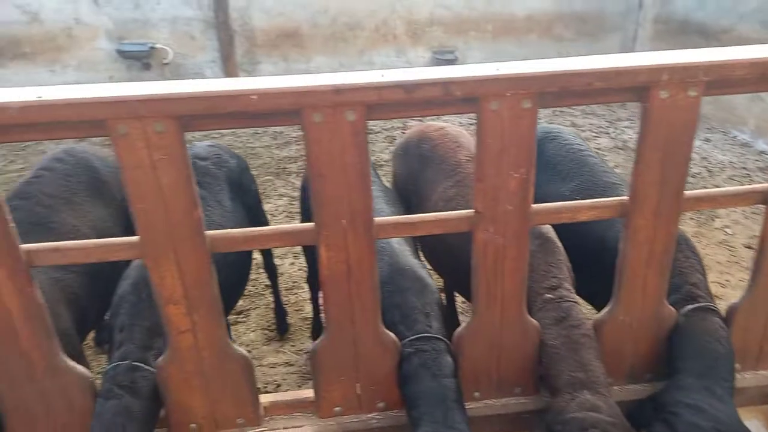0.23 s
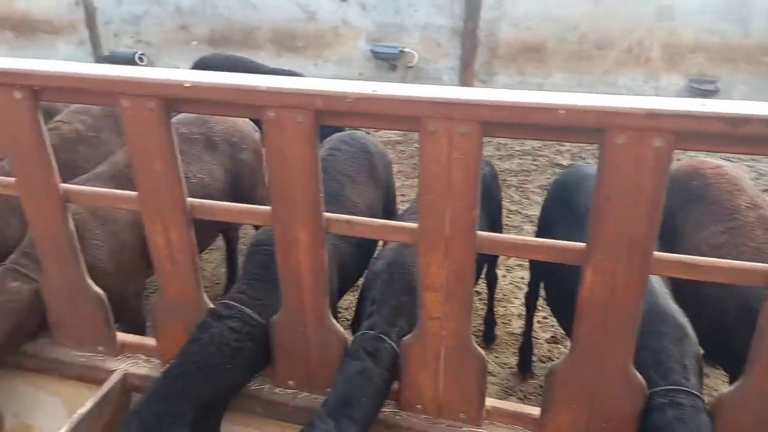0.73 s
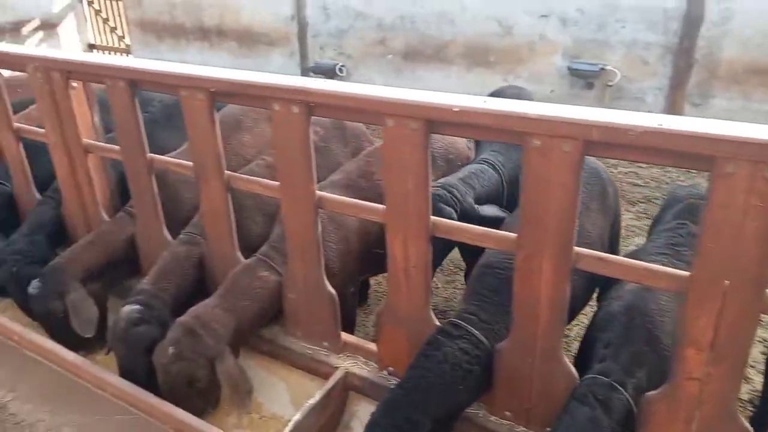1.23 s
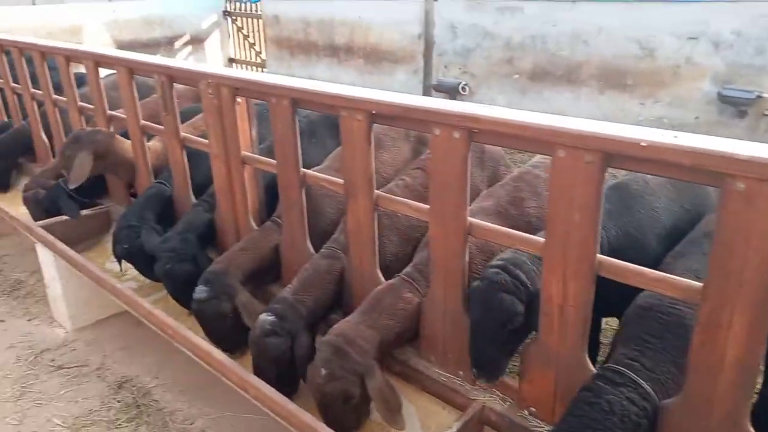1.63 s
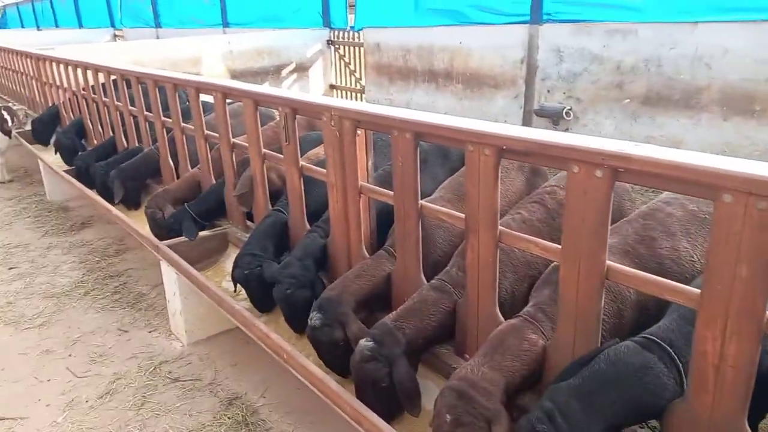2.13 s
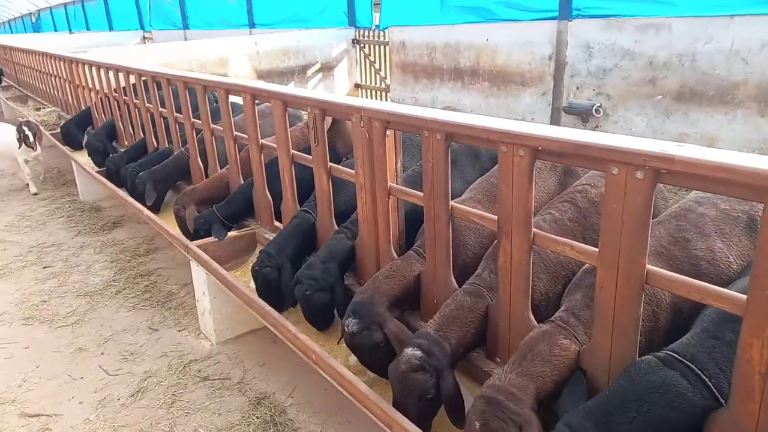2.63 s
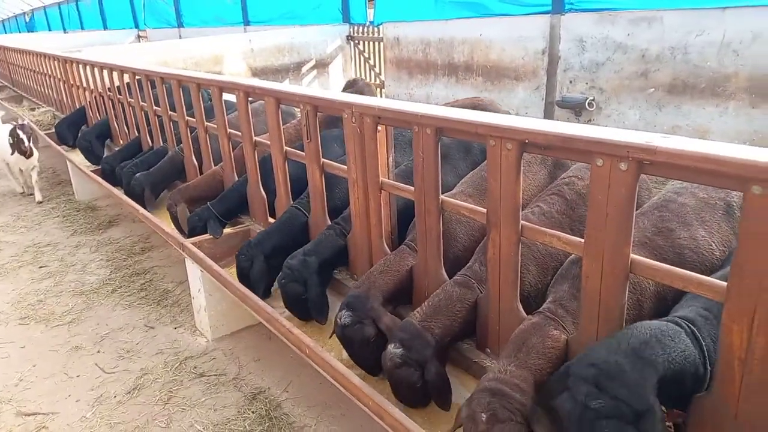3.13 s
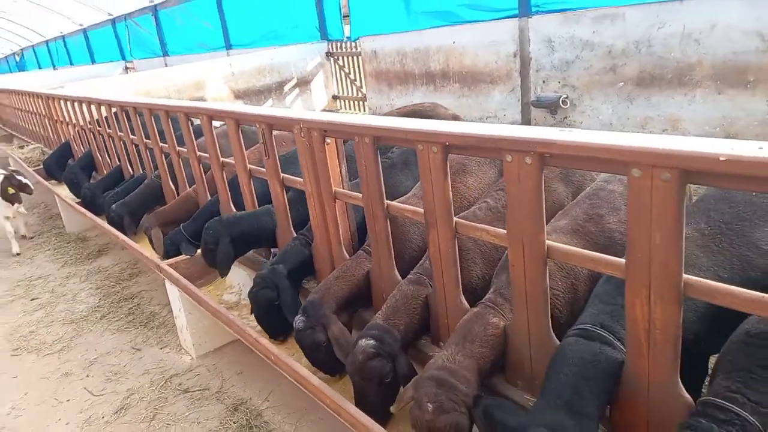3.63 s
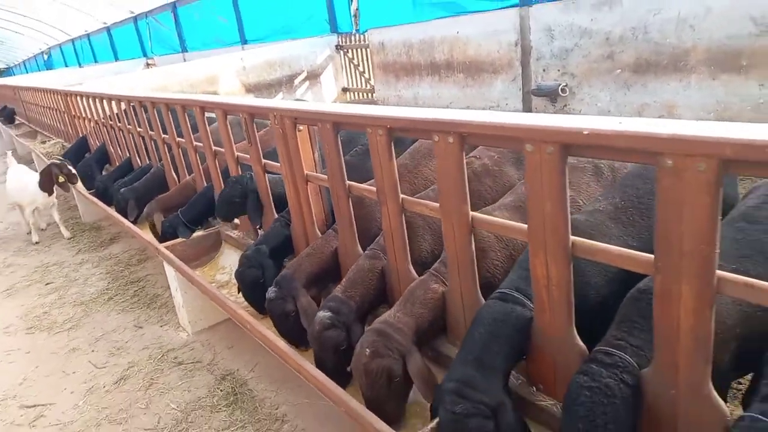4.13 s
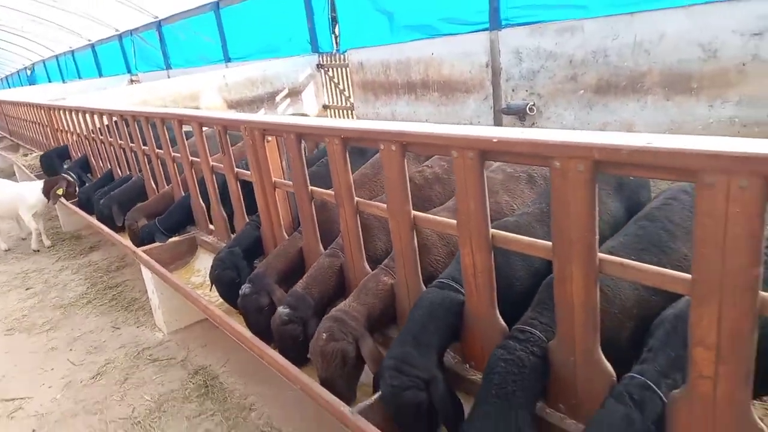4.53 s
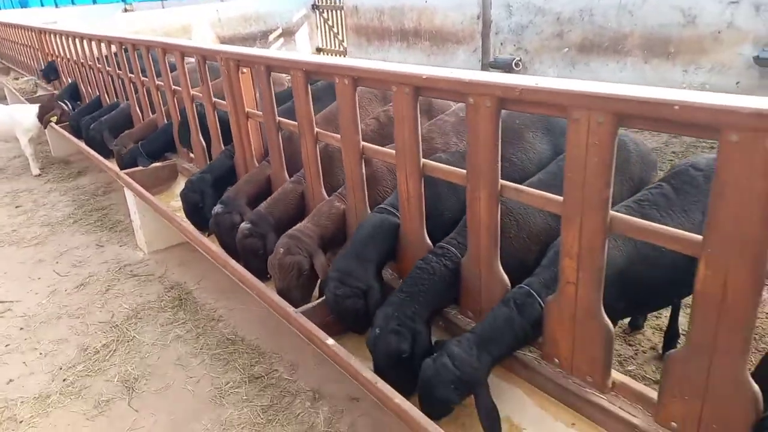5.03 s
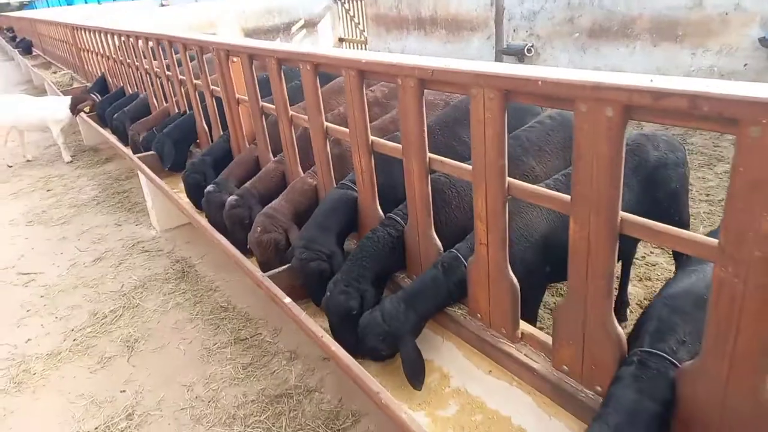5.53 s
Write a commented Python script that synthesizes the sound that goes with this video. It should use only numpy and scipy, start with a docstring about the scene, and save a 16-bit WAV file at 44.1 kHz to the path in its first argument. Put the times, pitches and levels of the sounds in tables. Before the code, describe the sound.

An open livestock shed with sheep and goats feeding, heard in stereo from beside the trough. The sound begins inside a loud, hoarse, low bleat from a near ewe, ending at about 0.3 s. A quieter, higher, lamb-like bleat swells from 0.6 to 1.5 s, with bumps and small ticks near 0.7-1.0 s. The ewe's loudest, clearer and drawn-out bleat runs from 1.6 to 2.4 s, nasal and buzzing, rising then dropping slightly. A more distant goat answers from 2.3 s, fading by 3.4 s. Muzzles rustle in dry feed throughout, stronger around 3.1 and 4.9 s; dull trough knocks come near 3.5-3.7, 4.4 and 5.2-5.4 s. Birds chirp harshly around 2.8-3.8 s and whistle at 4.0-4.5 and 5.1-5.8 s. A low closed-mouth rumble at 4.5 s leads into a short raspy bleat until 5.0 s; another rumble starts at 5.6 s. Soft wavering shed noise and short bright echoes surround everything.

```python
"""Sheep at a feed trough

Sheep feed in an open shed. A near ewe bleats twice, loud and drawn out; higher voices answer from down the row,
with a short hoarse bleat and closed-mouth rumbles: fold pulses and breath noise through throat resonances.
Muzzles rustle (grainy noise) and bump the trough (decaying modes), birds whistle outside (gliding tones),
the shed adds wavering octaves of noise, and walls and roof a short, bright echo (decaying noise)."""
import sys
import numpy as np
from scipy import signal
from scipy.fft import rfft, irfft
from scipy.io import wavfile
from scipy.ndimage import uniform_filter1d, map_coordinates

SR = 44100
rng = np.random.default_rng(int(sys.argv[2]) if len(sys.argv) > 2 else 0)


def to_wav(sig):
    """Store sig (one row per channel, or 1-D mono) as 16-bit WAV at the path in sys.argv[1].

    Samples outside -1..1 are clipped; the rate is SR.
    """
    pcm = np.clip(np.atleast_2d(sig), -1, 1) * 32767
    pcm = np.round(pcm).astype(np.int16)
    wavfile.write(sys.argv[1], SR, pcm.T)  # frames by channels


N = 254456
TIME = np.arange(N) / SR
TAPS = 4096
FREQS = np.arange(TAPS // 2 + 1) * SR / TAPS + 1  # Hz; the 1 keeps the logarithm finite


def undb(db):
    """Decibels to amplitude gain."""
    return 10 ** (np.asarray(db) / 20)


def unit(x):
    """Scale to rms 1."""
    return x / np.sqrt(np.mean(x ** 2))


def steady(x):
    """Scale to rms 1 over every thirtieth of a second."""
    return x / np.sqrt(uniform_filter1d(x ** 2, SR // 30) + 1e-18)


def curves(rows, t):
    """Columns of a table, joined by straight lines, at the times t."""
    s, *columns = np.transpose(rows)
    return [np.interp(t, s, column) for column in columns]


def add(track, s, x):
    """Mix x into the track from s seconds on."""
    i = max(int(s * SR), 0)
    track[i:i + len(x)] += x[:max(N - i, 0)]


def walk(rate_hz, t):
    """Smooth random wander of rms 1: a cubic curve through rate_hz random knots per second."""
    knots = rng.standard_normal(N // 10)
    return unit(map_coordinates(knots, [t * rate_hz], order=3, mode="wrap"))


def shape(x, gain):
    """Minimum-phase filter with the given gain at FREQS: every peak rings after its excitation."""
    cepstrum = irfft(np.log(gain + 1e-6))
    # fold the cepstrum onto positive times
    cepstrum[1:TAPS // 2] *= 2
    cepstrum[TAPS // 2 + 1:] = 0
    response = irfft(np.exp(rfft(cepstrum)))
    return signal.fftconvolve(x, response)[:len(x)]


def colour(x, points):
    """Filter by (Hz, dB) points, joined by straight lines over log frequency."""
    hz, db = np.transpose(points)
    return shape(x, undb(np.interp(np.log(FREQS), np.log(hz), db)))


# Level course of each call. Each row: start, crest and end in seconds, upper-band attack in s, release in s,
# levels of the band below 1.1 kHz and of the band above in dB before attack, release and placing,
# fade in dB per s (negative grows), upper-band tremolo depth in dB.
BLEATS = {"hoarse ewe": (-.25, -.05, .325, .1, .15, -29.3, -28.5, 5, 0),
          "long ewe": (1.56, 1.92, 2.4, .2, .19, -26.3, -26.6, 4, 0),
          "lamb": (.62, .95, 1.46, .39, .16, -55.5, -45, 9, 0),
          "goat": (2.27, 2.67, 3.46, .16, .4, -50.8, -39.8, 15, 0),
          "rumble": (4.49, 4.672, 4.74, .09, .06, -45.5, -57, -20, 12),
          "short bleat": (4.69, 4.85, 4.97, .07, .12, -40.5, -34.3, 0, 8.5),
          "opening rumble": (5.56, 5.755, 5.85, .07, .04, -46, -51.5, -75, 7)}
# Pitch arch of each call. Each row: start, crest and end pitch in Hz, arch exponent (1 straight, 2 round).
PITCH = {"hoarse ewe": (135, 146, 125.5, 1.6), "long ewe": (110, 147.2, 118, 2.3),
         "lamb": (172, 196.5, 175.5, 1.15), "goat": (188, 197.3, 180, .8), "rumble": (119, 129.3, 125, 1.4),
         "short bleat": (146, 156.5, 148, 1.3), "opening rumble": (100, 126, 120, 1.2)}
# Roughness at the crest of each call, 0-1.
CREST_ROUGH = {"hoarse ewe": .6, "long ewe": .08, "lamb": .2, "goat": .18, "rumble": .3, "short bleat": .89,
               "opening rumble": .7}
# One surge of the low band. Each row: centre in seconds, width in s (between the 1/e points), rise in dB.
SURGE = {"long ewe": (2.205, .05, 3), "lamb": (1.06, .09, 5), "goat": (2.59, .18, 6.5)}
END_ROUGH = .9
ATTACK_DEPTH_DB, UPPER_RELEASE_DB = 40, 20
LOW_ATTACK_RATIO, LOW_RELEASE_RATIO, LOW_TREMOLO_RATIO = 1.4, 1.5, 1.6  # low band over upper band
TREMOLO_HZ = 11.5


def effort(call):
    """Times, pitch, two band levels and roughness of a call: a pitch arch under attack, hold and release."""
    start, crest, end, attack_s, release_s, low_db, high_db, fade, tremolo_db = BLEATS[call]
    start_hz, crest_hz, end_hz, arch = PITCH[call]
    t = TIME[max(int(start * SR), 0):int(end * SR)]
    away = np.interp(t, [start, crest, end], [1, 0, 1])  # 0 at the crest, 1 at both ends
    hz = crest_hz + (np.where(t < crest, start_hz, end_hz) - crest_hz) * away ** arch

    def swell(length_s):
        """Attenuation in dB while the call swells."""
        return ATTACK_DEPTH_DB * np.maximum(1 - (t - start) / length_s, 0) ** 2

    dying = UPPER_RELEASE_DB * np.maximum(1 - (end - t) / release_s, 0) ** 2
    fading = fade * (t - crest)
    stutter = tremolo_db * np.sin(np.pi * TREMOLO_HZ * (t - crest)) ** 2
    low = low_db - swell(attack_s * LOW_ATTACK_RATIO) - LOW_RELEASE_RATIO * dying
    low = low - fading - LOW_TREMOLO_RATIO * stutter
    if call in SURGE:
        s, length_s, rise_db = SURGE[call]
        low = low + rise_db * np.exp(-(2 * (t - s) / length_s) ** 2)
    high = high_db - swell(attack_s) - dying - fading - stutter
    rough = CREST_ROUGH[call] + (END_ROUGH - CREST_ROUGH[call]) * away ** 2
    return t, hz, low, high, rough


# Throat resonances. Each row: mid-call frequency in Hz, full width in Hz at 8.6 dB down, relative level in dB.
EWE_HOARSE_THROAT = [(75, 40, -17), (150, 570, -25.5), (408, 63, -9), (585, 150, 1), (1064, 220, -11),
                     (1254, 300, -19), (1500, 530, -8.5), (1998, 335, 1), (2374, 370, -7),
                     (3890, 1840, -18.5), (6370, 2200, -29)]
EWE_THROAT = [(75, 40, -13), (147, 240, -18.5), (276, 270, -20), (457, 73, -5), (567.4, 95, 2.5),
              (927, 300, -24), (1436, 325, -1.5), (1740, 400, -15), (2147, 347, 1), (2644, 340, -8),
              (3445, 820, -19.5), (4590, 760, -25), (6260, 1700, -29.5)]
LAMB_THROAT = [(390, 160, 1), (537, 180, 6), (1433, 290, 2.5), (2192, 376, 4.5), (2700, 330, -2),
               (3435, 250, -11), (4000, 4800, -18)]
GOAT_THROAT = [(796, 180, 5), (1007, 203, -11.5), (1586, 260, 0), (1950, 160, -2), (2164, 190, 4),
               (2390, 200, -1), (2600, 590, -10.5), (3560, 3600, -23)]
SHORT_THROAT = [(640, 170, 6), (835, 850, -7.5), (1556, 420, 7.5), (2140, 290, 13), (2610, 490, -1),
                (4220, 2500, -26)]
CLOSED_THROAT = [(124, 110, 4), (273, 160, 8), (352, 110, -1), (760, 600, -4.5), (1640, 370, -10.5),
                 (2030, 880, -4)]
ROUGH_WOBBLE, ROUGH_FLUTTER_DB = .006, 2  # rms pitch share and low-band dB at roughness 1
NASAL_HZ = 350  # below this the voice gains while the mouth is half shut, at both ends of a call
VOICE_TOP_HZ = 6900


def bleat(call, throat, jitter, rasp, quiver_db, air_db, opening_hz=0, closing_db=0):
    """Uneven fold pulses and a puff of air per cycle ring a throat gliding from -opening_hz to +opening_hz."""
    t, hz, low_db, high_db, rough = effort(call)
    uneven = jitter * walk(130, t) + ROUGH_WOBBLE * walk(24, t)
    phase = np.cumsum(hz * (1 + rough * uneven)) / SR  # cycles
    harmonics = np.arange(1, int(VOICE_TOP_HZ / hz.max()))
    pulses = unit(sum(np.cos(2 * np.pi * k * phase) for k in harmonics))
    pulses = pulses * undb(4.5 * rough * walk(110, t))
    puffs = unit(np.exp(-(phase % 1) / .35) * rng.standard_normal(len(t)))
    puffs = colour(puffs, [(100, -14), (600, -7.5), (2000, -2), (3500, 1), (6700, 3), (7300, 0)])
    source = pulses + rasp * rough * puffs

    # crossfade five throat positions from start (-1) to end (1)
    voice = 0
    for stage in (-1, -.5, 0, .5, 1):
        gain = 0
        for f, width, db in throat:
            detune = 2 * (FREQS - f - stage * opening_hz) / width
            gain = gain + undb(db) / (1 + detune ** 2) ** 1.436
        gain = gain * undb(closing_db * (abs(stage) - .5) / (1 + (FREQS / NASAL_HZ) ** 6))
        gain = gain / np.sqrt(1 + (FREQS / VOICE_TOP_HZ) ** 60)
        share = np.maximum(1 - 2 * abs(np.linspace(-1, 1, len(t)) - stage), 0)
        voice = voice + share * shape(source, gain)
    air = colour(puffs, [(5000, 10), (7500, -9.5), (12000, -3.5), (15500, -18.5)])
    voice = voice + undb(air_db) * air

    low = signal.sosfiltfilt(signal.butter(4, 1100, fs=SR, output="sos"), voice)
    high = steady(voice - low) * undb(high_db)
    low = steady(low) * undb(low_db + ROUGH_FLUTTER_DB * rough * walk(16, t))
    edges = signal.windows.tukey(len(t), 0.004 * SR / len(t))
    track = np.zeros(N)
    add(track, t[0], (low + high) * edges * undb(quiver_db * walk(35, t)))
    return track


# Background level. Each row: time in seconds, level in dB before SHED_GAIN_DB.
SHED_LEVEL = [(0, -56), (.55, -66), (1.5, -58), (3.1, -58), (3.5, -61), (3.95, -62.5), (5.05, -55.5),
              (5.5, -62.5), (5.77, -56.5)]
# Background spectrum. Each row: frequency in Hz, relative density in dB per Hz.
SHED_COLOUR = [(25, -35), (50, -6.5), (85, 5.5), (130, -5.5), (300, -2.5), (520, -9), (780, -5.5),
               (1100, -14.5), (1600, -1.5), (2200, 0.5), (3000, -6.5), (6500, -16), (7500, -29.5),
               (15000, -49)]
SHED_GAIN_DB = 0.5


def shed():
    """Diffuse noise: each octave wavers by itself; the bass is nearly alike in both ears."""
    level_db, = curves(SHED_LEVEL, TIME)
    stir = 0
    for hz in 30 * 2 ** np.arange(9):
        octave = signal.butter(2, [hz, 2 * hz], "band", fs=SR, output="sos")
        noise = signal.sosfilt(octave, rng.standard_normal((2, N)))
        stir = stir + noise * undb(2 * walk(13, TIME))
    mid, side = (colour(x, SHED_COLOUR) for x in stir)
    side = colour(side, [(100, -8), (300, -16), (800, -0.5)])
    return np.array([mid + side, mid - side]) / mid.std() * undb(level_db + SHED_GAIN_DB)


# Muzzles root in the feed. Each row: centre in seconds, width in s (13.6 dB down at its edges),
# peak level in dB before gain_db.
RUSTLES = [(.72, .1, -70), (1.0, .28, -70), (1.31, .12, -67.5), (1.59, .14, -62), (2.62, .2, -69),
           (3.06, .22, -60.5), (3.41, .1, -68), (3.6, .2, -63.5), (3.99, .32, -66.5), (4.35, .07, -64),
           (4.9, .34, -61), (5.26, .14, -67), (5.44, .07, -65), (5.7, .25, -64)]
# Feed spectrum. Each row: frequency in Hz, relative gain in dB.
FEED_COLOUR = [(2500, -12), (4500, -3.5), (6700, -3), (7400, -18), (9500, -10), (12000, -8.5), (15500, -15)]


def feeding(chewing_db=-73, grain_spread_db=1.5, gain_db=6, unrest_db=1.5):
    """Dense, uneven grains shift under many muzzles (chewing_db before gain_db), louder when one roots."""
    power = undb(chewing_db + unrest_db * walk(9, TIME)) ** 2
    for s, length_s, db in RUSTLES:
        power = power + undb(db) ** 2 * np.exp(-np.pi * (2 * (TIME - s) / length_s) ** 2)
    grains = undb(grain_spread_db * walk(400, TIME))
    ears = [unit(colour(grains * rng.standard_normal(N), FEED_COLOUR)) for _ in range(2)]
    return np.array(ears) * np.sqrt(power) * undb(gain_db)


def note(length_s, glide_hz, db, rough):
    """One tone gliding through three pitches; a fast pitch waver makes it harsh."""
    t = np.arange(int(length_s * SR)) / SR
    hz = np.polyval(np.polyfit([0, .5, 1], glide_hz, 2), t / length_s)
    phase = np.cumsum(hz * (1 + 0.0745 * rough * walk(595.7, t))) / SR
    level = undb(db + 2.5 * walk(40.5, t))
    return np.sin(2 * np.pi * phase) * signal.windows.tukey(len(t), .4) * level


# Whistles. Each row: start in seconds, length in s, start, middle and end pitch in Hz, level in dB before placing.
WHISTLES = [(.637, .29, 3420, 4030, 4850, -55.5), (1.465, .23, 4260, 5375, 6070, -51),
            (4.015, .075, 2285, 2450, 2720, -54), (4.105, .14, 2405, 2383, 2408, -51),
            (4.293, .18, 5410, 6650, 7100, -66.5), (4.343, .1, 2316, 2403, 2180, -52),
            (4.44, .11, 2090, 1920, 1980, -55.5), (5.073, .05, 2990, 2750, 2620, -60),
            (5.175, .24, 2217, 2281, 2260, -51.5), (5.297, .16, 5400, 6570, 7400, -62),
            (5.39, .11, 3940, 4460, 5200, -63.5), (5.487, .085, 5160, 5220, 5140, -56),
            (5.666, .085, 2248, 2233, 2290, -49.5), (5.692, .07, 3930, 4260, 4740, -55)]
# Chirps. Each row: start in seconds, length in s, middle pitch in Hz, level in dB before placing, roughness 0-1.
CHIRPS = [(.422, .038, 6400, -55.5, .4), (.557, .01, 4650, -46, .05), (.574, .05, 4845, -57, .4),
          (1.06, .06, 6480, -54.5, .5), (1.28, .09, 6600, -56, .35), (2.771, .076, 4120, -49.5, .7),
          (3.228, .04, 3950, -53.5, .8), (3.285, .03, 4350, -49.5, .8), (3.333, .03, 4400, -50, .8),
          (3.585, .1, 4280, -52, .5), (3.616, .0104, 4220, -39.5, .05), (3.69, .07, 4200, -57, .5),
          (3.785, .08, 4200, -52.5, 1)]
WHISTLE_ROUGH = .17
CHIRP_FALL = .03  # share of the pitch, either side of the middle


def birds():
    """Clear gliding whistles and falling chirps, many of them harsh."""
    track = np.zeros(N)
    for s, length_s, *glide_hz, db in WHISTLES:
        add(track, s, note(length_s, glide_hz, db, WHISTLE_ROUGH))
    for s, length_s, hz, db, rough in CHIRPS:
        glide_hz = hz * (1 + CHIRP_FALL * np.array([1, 0, -1]))
        add(track, s, note(length_s, glide_hz, db, rough))
    return track


# Heads bump the trough. Each row: start in seconds, peak level in dB before placing, ring in Hz.
BUMPS = [(0.716, -56.5, 198), (.827, -51.5, 414), (2.641, -65, 202), (2.826, -60, 179), (3.535, -53, 109),
         (3.599, -51, 298), (3.737, -57.5, 264), (4.406, -50.5, 265), (5.226, -59, 245), (5.435, -58, 298)]
# Trough modes. Each row: multiple of the ring, relative level in dB, t60 in s.
TROUGH = [(.32, -7, 0.083), (.72, -2.5, 0.06), (1, 1.5, 0.09), (1.23, -6, 0.086), (1.75, -12.5, 0.076),
          (2.6, -39, .05)]
# Ticks of feed and rails. Each row: start in seconds, level in dB before placing, pitch in Hz.
TICKS = [(.718, -52, 1500), (.842, -44, 4180), (1.022, -42.5, 3630), (3.739, -46.5, 3130)]


def knocks(tick_t60_s=0.01, push_s=0.025):
    """Soft, scuffing bumps (decaying noise) ring the trough modes; hard little contacts tick."""
    track, t = np.zeros(N), np.arange(SR // 3) / SR
    for s, db, hz in BUMPS:
        ring = 0
        for ratio, mode_db, t60_s in TROUGH:
            ring = ring + undb(mode_db - 60 * t / t60_s) * np.sin(2 * np.pi * hz * ratio * t)
        push = rng.standard_normal(len(t)) * np.exp(-t / push_s)
        thud = signal.fftconvolve(ring, push)[:len(t)]
        add(track, s, undb(db) * thud / abs(thud).max())
    for s, db, hz in TICKS:
        contact = np.sin(2 * np.pi * hz * t) + 0.1 * rng.standard_normal(len(t))
        add(track, s, undb(db - 60 * t / tick_t60_s) * contact)
    return track


def place(x, gain_db, wet_db, pan_db, lag_s, bend_rad=0, late_t60_s=0.5, early_t60_s=0.18, late_db=-8):
    """Direct sound reaches the right lag_s later; rails and wall scatter it early, the roof late, treble most."""
    t, lead = np.arange(int(SR * .7)) / SR, 256  # lead: samples of room for the earlier ear
    decay = undb(-60 * t / early_t60_s) + undb(late_db - 60 * t / late_t60_s)
    decay /= np.sqrt(np.sum(decay ** 2))
    # phase between the ears in radians: the lag, bent further in a narrow band
    between = 2 * np.pi * FREQS * lag_s + bend_rad * np.exp(-((FREQS - 580) / 110) ** 2)
    echo_colour = [(150, -16), (600, -13), (1400, -2.5), (2200, -1), (6000, 2), (14000, 0)]
    direct_colour = [(600, -2.5), (1400, -1.5), (2200, -5.5), (4000, -10)]
    ears = []
    for side in (1, -1):  # left, right
        direct = np.roll(irfft(np.exp(.5j * side * between)), lead)
        echo = colour(decay * rng.standard_normal(len(t)), echo_colour)
        response = np.pad(undb(wet_db) * echo, (lead, 0))
        response[:TAPS] += colour(direct, direct_colour)
        # pan_db: left over right, 1.4-2.6 kHz
        pan = side * pan_db / 2
        response = colour(response, [(400, 0.025), (600, side * 1.), (1400, pan), (2600, pan), (4000, 0)])
        ears.append(signal.fftconvolve(x, response)[lead:lead + N])
    return undb(gain_db) * np.array(ears)


def scene():
    """The animals along the trough, the birds and the shed."""
    hoarse = bleat("hoarse ewe", EWE_HOARSE_THROAT, jitter=0.042, rasp=0.93, quiver_db=1.0, air_db=-28,
                   opening_hz=-34, closing_db=3)
    long = bleat("long ewe", EWE_THROAT, jitter=.033, rasp=.9, quiver_db=1.0, air_db=-34,
                 opening_hz=22, closing_db=4)
    lamb = bleat("lamb", LAMB_THROAT, jitter=0.0304, rasp=.8, quiver_db=1.2, air_db=-53, opening_hz=110)
    goat = bleat("goat", GOAT_THROAT, jitter=0.0358, rasp=1.0, quiver_db=1.6, air_db=-56, opening_hz=10)
    short = bleat("short bleat", SHORT_THROAT, jitter=0.0501, rasp=2.0, quiver_db=1.5, air_db=-38)
    rumble = bleat("rumble", CLOSED_THROAT, jitter=0.055, rasp=1.3, quiver_db=1.5, air_db=-50)
    opening = bleat("opening rumble", CLOSED_THROAT, jitter=0.059, rasp=1.7, quiver_db=2.5, air_db=-47)
    return (place(hoarse, gain_db=0.5, wet_db=-0.5, pan_db=-5.5, lag_s=0.00035)
            + place(long, gain_db=5.0, wet_db=-0.5, pan_db=-5.5, lag_s=0.00036, bend_rad=0.74)
            + place(lamb + short, gain_db=0, wet_db=2.5, pan_db=-5.5, lag_s=0.00034)
            + place(goat, gain_db=-1, wet_db=3.5, pan_db=-5, lag_s=0.00016)
            + place(rumble + opening, gain_db=0, wet_db=10, pan_db=-7, lag_s=0.00036)
            + place(birds(), gain_db=2.5, wet_db=-2, pan_db=-1, lag_s=.00003)
            + place(knocks(), gain_db=8, wet_db=4.5, pan_db=-12, lag_s=.00004)
            + feeding() + shed())


def record(dry):
    """Band limits: the deepest bass rolls off below 45 Hz, the top is cut steeply above 15.75 kHz."""
    dry = signal.sosfilt(signal.butter(2, 45, "high", fs=SR, output="sos"), dry)
    return signal.sosfilt(signal.ellip(10, .2, 80, 15750, fs=SR, output="sos"), dry)


dry = scene()
out = record(dry)
to_wav(out)
```